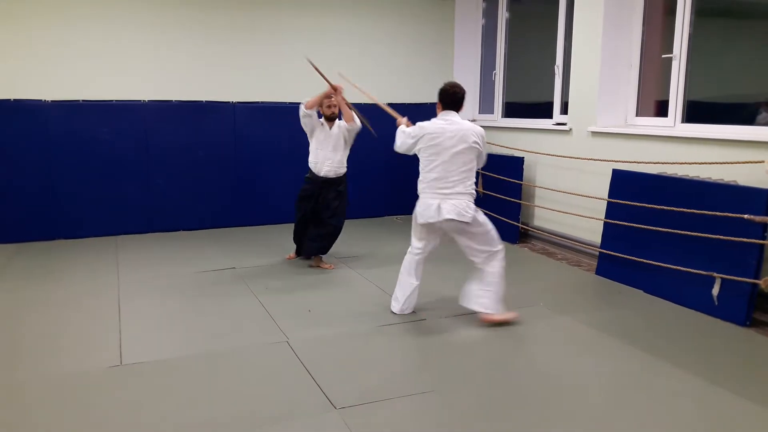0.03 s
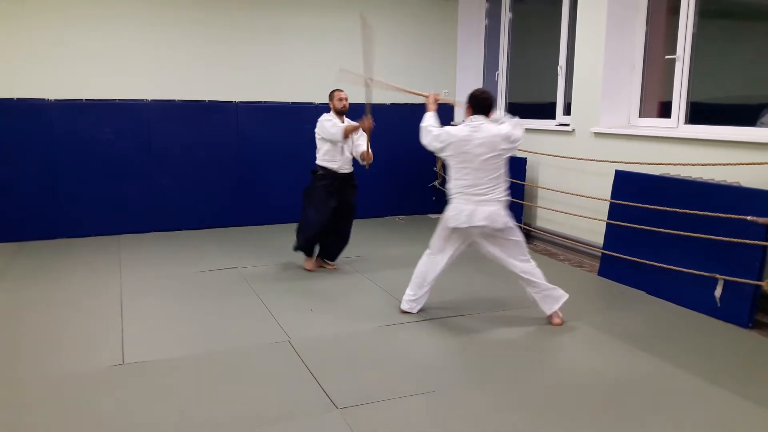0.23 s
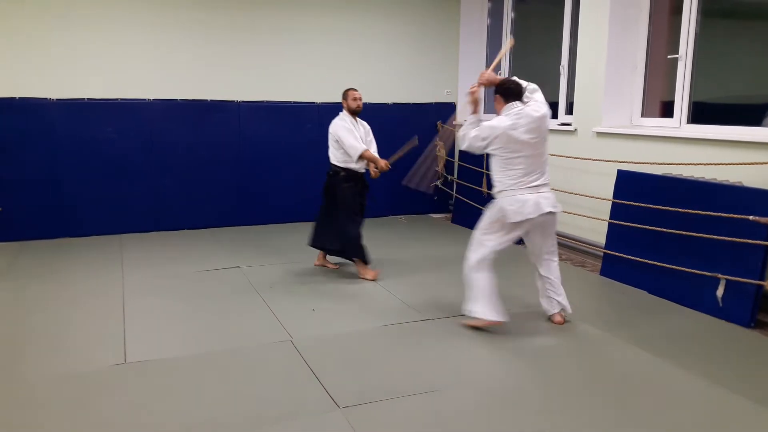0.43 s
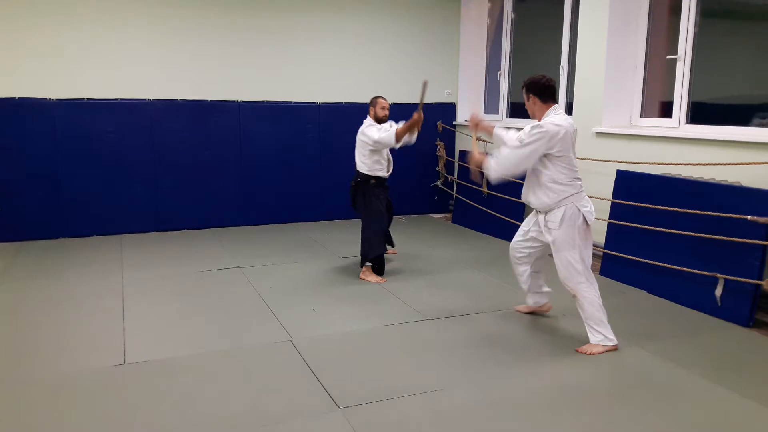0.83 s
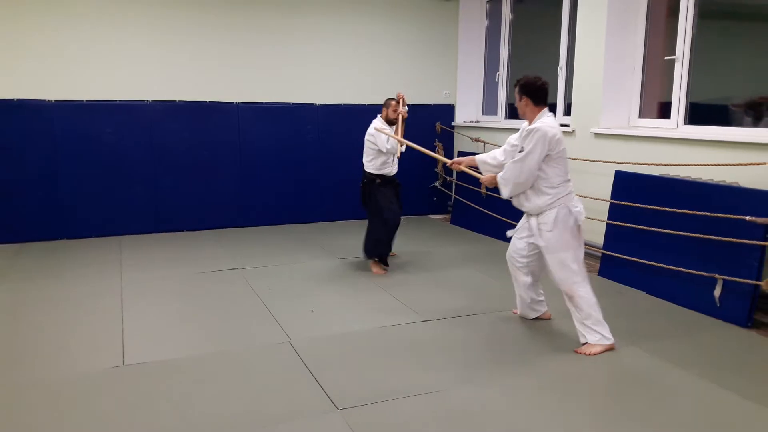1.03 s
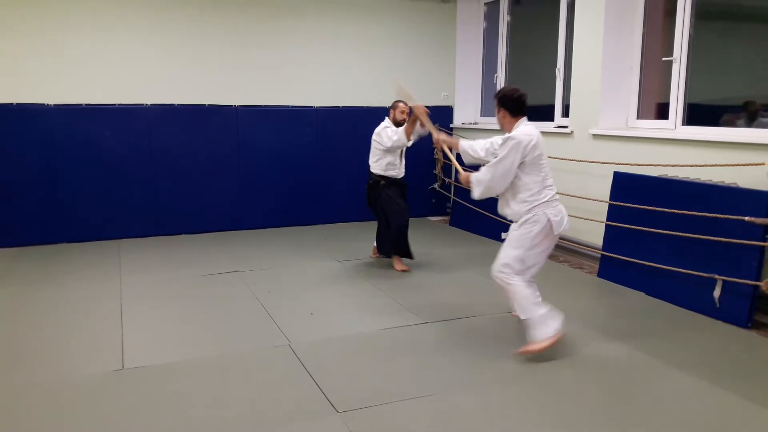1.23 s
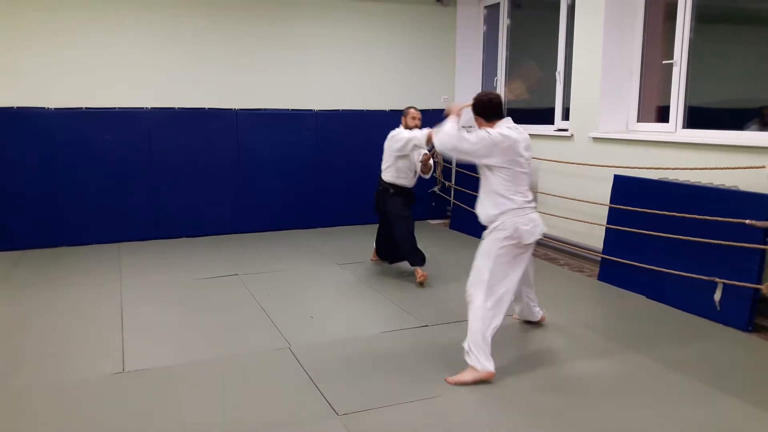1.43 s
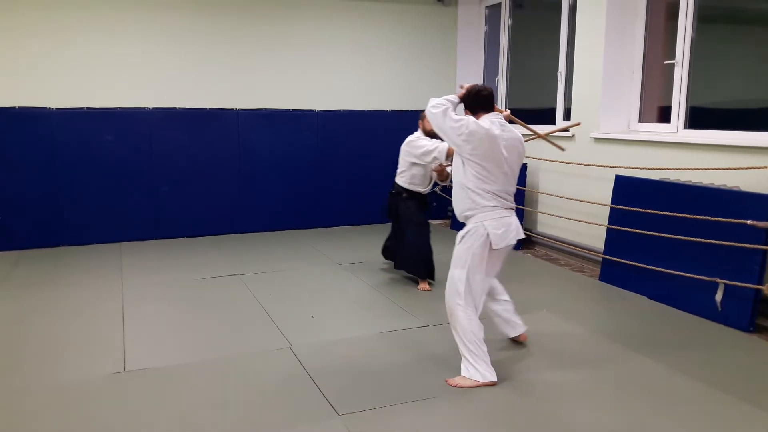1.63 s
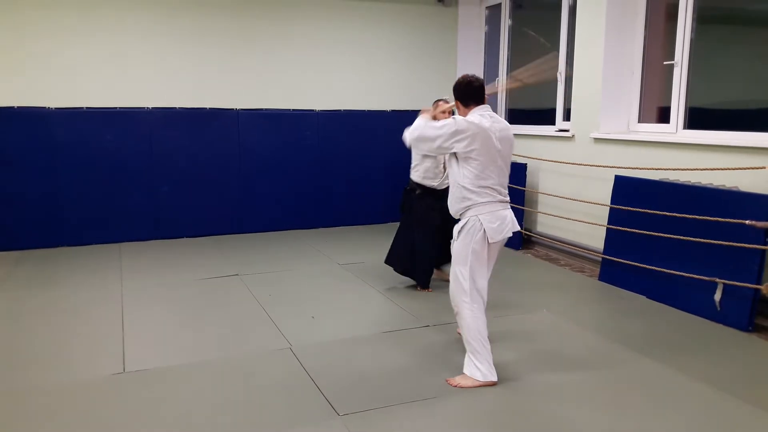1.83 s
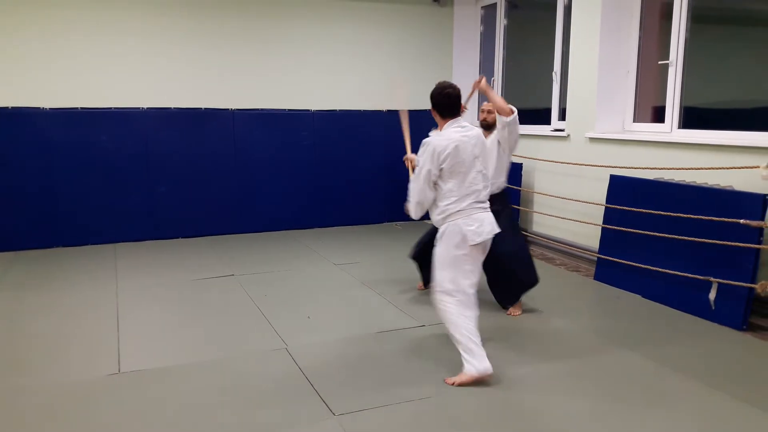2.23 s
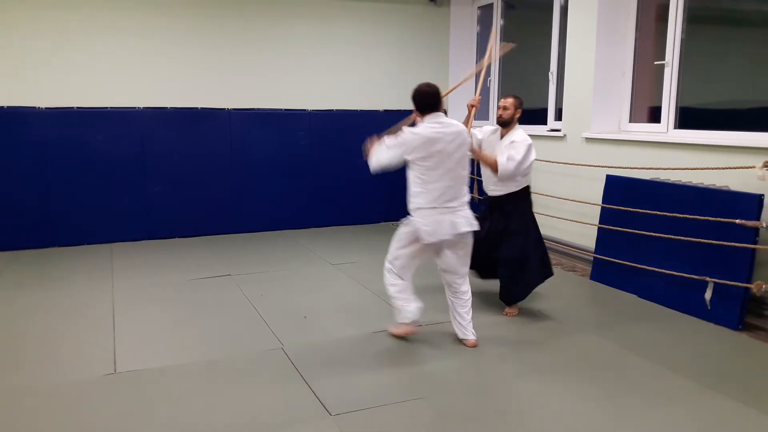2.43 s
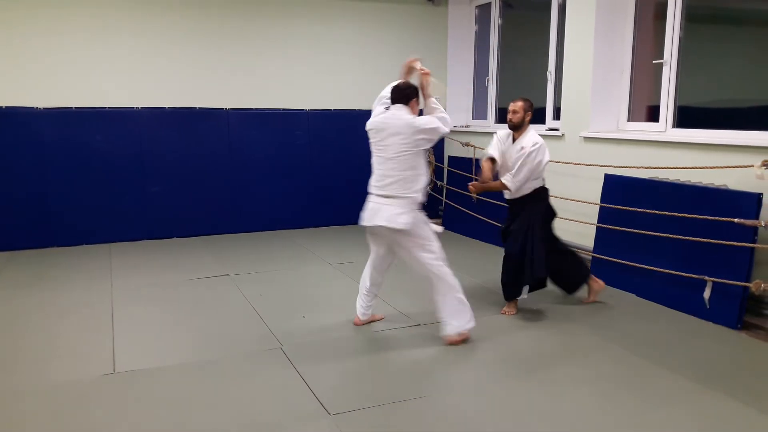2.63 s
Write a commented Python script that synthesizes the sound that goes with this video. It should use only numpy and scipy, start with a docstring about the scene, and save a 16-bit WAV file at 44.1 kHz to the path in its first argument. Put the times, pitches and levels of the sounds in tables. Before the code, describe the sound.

Wooden staffs crack together three times in a bare, echoing hall. A faint swish leads into the first hit at 0.2 seconds, which briefly overloads the microphone. The others land at 1.4 and 2.2 seconds, all slightly left, each echoing for about a second. Between and after the blows, jackets rustle and bare feet slide and thud quietly on mats, most noticeably from 2.2 to 2.5 seconds.

```python
"""Staff sparring in a bare hall

Two people spar on mats. Three sharp cracks send bending waves along the wooden staffs, set them
ringing and echo round the hall; the first overloads the left microphone and ducks the limiter.
Between blows jackets rustle, bare feet slide and thud, and a swung staff swishes, over still air."""
import sys
import numpy as np
from scipy import signal
from scipy.fft import rfft, irfft
from scipy.io import wavfile
from scipy.ndimage import uniform_filter1d, minimum_filter1d

SR = 44100
rng = np.random.default_rng(int(sys.argv[2]) if len(sys.argv) > 2 else 0)


def materialize(psi):
    """Save the field psi as 16-bit PCM at rate SR to the path in sys.argv[1].

    A 1-D psi becomes a single channel; in a 2-D psi each row is a channel.
    """
    bounded = np.clip(np.atleast_2d(psi).T, -1, 1)
    quanta = np.round(bounded * 32767).astype(np.int16)
    wavfile.write(sys.argv[1], SR, quanta)


N = 119070
TIME = np.arange(N) / SR
HZ = np.maximum(np.fft.rfftfreq(2 * N, 1 / SR), 1)
LN_1000 = np.log(1000)  # 60 dB of decay

# crack spectra: (frequency [Hz], level in blow 1, 2, 3 [dB])
CRACK_SPECTRA = [(169, -38, -24.5, -20.5), (400, -30, -20.5, -16.5), (630, -21, -15.5, -17),
                 (777.8, -16, -10.5, -5.5), (1190, -3, -2, -0.5), (1566, -5.5, 1.5, 3.5),
                 (2550, -0.5, 2, 1), (3590, -8, -1, 1), (3970, -7, -8.5, -12), (5100, -13, -8.5, -11.5),
                 (5540, -17, -14.5, -13), (7640, -15.5, -19.5, -22), (9100, -30.5, -38, -33.5),
                 (16200, -34.5, -45, -38)]


def from_db(db):
    """Decibels to gain."""
    return 10 ** (np.asarray(db) / 20)


def at_hz(points, hz, column=1):
    """Table column interpolated over log frequency."""
    table = np.array(points)
    return np.interp(np.log(hz), np.log(table[:, 0]), table[:, column])


def pan(db):
    """Stereo gains, left over right by db."""
    return from_db(np.array([[db], [-db]]) / 2)


def delay(s):
    """Frequency response of a delay."""
    return np.exp(-2j * np.pi * HZ * s)


def minimum_phase(db):
    """Causal response with the given levels."""
    cepstrum = irfft(np.log(from_db(db)))
    cepstrum[1:N] *= 2
    cepstrum[N + 1:] = 0
    return np.exp(rfft(cepstrum))


def resonance(hz, width_hz):
    """Response of one resonance, peak gain 1."""
    return 1 / (1 + 1j * (HZ ** 2 - hz ** 2) / (HZ * width_hz))


def filtered(x, response):
    """Signal through a frequency response."""
    return irfft(rfft(x, 2 * N) * response)[..., :N]


def noise(response, channels=2):
    """Coloured noise, independent channels, rms 1."""
    x = irfft(rfft(rng.standard_normal((channels, N))) * response[::2])
    return x / x.std()


def staff_blows(right_lag_s=.0001):
    """Each blow makes two contacts and a bending wave, highs first, that sets the staffs ringing."""
    # blows: (time [s], strength [dB], second contact lag [s], its level [dB], dispersion scale [s],
    # pan [dB], hall send [dB], hall decay factor [-])
    blows = [(.2143, 21, 0.001738, 4.5, 0.00041, 9.5, 7, 0.9),
             (1.3964, 14, 0.001225, -0.5, .0007, 9, 1.5, 1.08),
             (2.1620, 16, .0034, -9.5, 0.00055, 6.5, 1.12, 0.81)]
    # bending modes, share set by contact point: (frequency [Hz], t60 [s], re crack in blow 1, 2, 3 [dB])
    modes = [(346, 0.017, 4, 7, -10), (555, .04, -8, 0.5, 5), (810, 0.044, 0, -4, 5.5),
             (1104, 0.041, -1.5, 4, -5), (1225, 0.082, -7, -12, 4), (1374, 0.039, -1, -4.5, -32),
             (1540, 0.047, 3, -14, 4), (1891, 0.027, 0.5, -1, 0.5), (2130, 0.026, -40, -4, -38.5),
             (2427, 0.01, -15, -25, -9), (2694, 0.011, -5.5, -10, -10), (3050, 0.033, -21, -5.5, -20),
             (3640, 0.037, -9, -6, 2), (4810, 0.017, -10, -12, -7)]
    # first echoes off mat and walls: (left delay [s], right delay [s], left level [dB], right level [dB])
    reflections = [(.0026, .0037, -13, -13), (.0102, .0103, -10, -13), (.0215, .0195, -15, -14),
                   (.0245, .0255, -16, -15)]
    # colour of the direct sound: (frequency [Hz], level [dB])
    direct_spectrum = [(200, -10), (800, -1.5), (1500, -0.5), (2000, 0.5), (2450, 4.5), (3100, -0.5),
                       (4200, 3.5), (8000, -4), (16000, 8.5)]
    direct = minimum_phase(at_hz(direct_spectrum, HZ))
    echoes = sum(np.array([from_db(left_db) * delay(left_s), from_db(right_db) * delay(right_s)])
                 for left_s, right_s, left_db, right_db in reflections)
    rings = [resonance(hz, LN_1000 / np.pi / t60_s) for hz, t60_s, *_ in modes]
    ears = np.array([delay(0), delay(right_lag_s)]) * np.sqrt(.5)
    out = 0
    for k, (time_s, db, second_s, second_db, spread_s, pan_db, hall_db, decay_factor) in enumerate(blows):
        crack = from_db(db) * delay(time_s) * minimum_phase(at_hz(CRACK_SPECTRA, HZ, column=k + 1))
        bending = delay(2 * spread_s * np.sqrt(1000 / (HZ + 300)))
        wood = 1 + sum(from_db(mode[k + 2]) * ring for mode, ring in zip(modes, rings))
        contacts = 1 + from_db(second_db) * delay(second_s)
        near = contacts * direct * (pan(pan_db) * ears + echoes)
        reverb = from_db(hall_db) * hall_response(decay_factor)  # the contacts merge here
        out = out + crack * bending * wood * (near + reverb)
    return irfft(out)[:, :N]


def rustles(hall, pivot_hz=7000, grain_db=2.5, pan_db=7.5, hall_db=-7):
    """Jackets and soles brush in grainy swells, each with its own brightness."""
    # swells: (peak time [s], relative level [dB], rise [s], fall [s], tilt [dB/octave])
    swells = [(.055, -62.5, .05, 0.047, -0.5), (.16, -61.5, 0.034, 0.026, -4), (0.546, -46, 0.03, 0.02, -1),
              (.55, -37.5, 0.018, 0.036, -4.5), (.645, -49.5, 0.046, 0.037, 2.5),
              (.76, -59, 0.064, 0.04, 4), (1.063, -58, .012, 0.011, -4), (1.165, -61, 0.022, .045, 2),
              (1.275, -57, .04, 0.066, 2), (1.42, -54.5, 0.026, 0.055, 0), (1.60, -68, 0.051, 0.022, -2),
              (1.77, -47, 0.11, 0.097, -7), (2.125, -56, 0.023, .03, -1.5),
              (2.23, -39.5, 0.03, 0.091, -8.5), (2.36, -38.5, 0.081, 0.076, -6.5),
              (2.68, -46, 0.072, 0.067, -4.5)]
    # brushing spectrum: (frequency [Hz], level [dB])
    brush_spectrum = [(700, -22.5), (2000, 3), (4000, -6.5), (7500, -1.5), (9500, -6), (12500, -2.5),
                      (16000, -14)]
    colour_db = at_hz(brush_spectrum, HZ)
    octaves = np.log2(np.maximum(HZ, 1000) / pivot_hz)
    out = 0
    for peak_s, db, rise_s, fall_s, tilt in swells:
        swell = np.exp(-((TIME - peak_s) / np.where(TIME < peak_s, rise_s, fall_s)) ** 2 / 2)
        brush = noise(from_db(colour_db + tilt * octaves) * HZ / (HZ + 500))
        out = out + from_db(db + 1.5) * swell * brush
    grain = uniform_filter1d(rng.standard_normal(N), size=120)
    out = out * from_db(grain_db * grain / grain.std())
    return out * pan(pan_db) + filtered(out[0], from_db(hall_db) * hall)


def footsteps(hall, rise_s=0.003, relative_width=0.76, scuff_db=-4, hall_db=-6.5):
    """Bare feet land and push on the mats: soft thuds with a little scuff."""
    # footfalls: (time [s], level [dB], pitch [Hz], decay [s])
    footfalls = [(0.142, -62, 185, .05), (0.439, -65, 230, 0.073), (0.547, -63, 215, 0.073),
                 (0.615, -57, 250, 0.078), (1.267, -63, 227, 0.066), (1.311, -65, 110, 0.15),
                 (1.435, -62, 165, 0.097), (1.863, -59, 107, 0.13), (2.006, -64, 190, 0.19),
                 (2.091, -61.5, 101.5, 0.21), (2.202, -50.5, 213, 0.096), (2.344, -57.5, 159, 0.091),
                 (2.521, -61, 252, 0.18)]
    scuff = from_db(scuff_db) * noise(resonance(470, 760) ** 2, channels=1)[0]
    out = 0
    for time_s, db, hz, decay_s in footfalls:
        age_s = np.maximum(TIME - time_s, 0)
        envelope = (1 - np.exp(-age_s / rise_s)) * np.exp(-age_s / decay_s)
        thud = noise(resonance(hz, relative_width * hz) ** 2, channels=1)[0]
        out = out + from_db(db) * (thud + scuff) * envelope
    return out + filtered(out, from_db(hall_db) * hall)


def swish(peak_s=.11, sigma_s=0.07, pitch_hz=630, width_hz=240, level_db=-58):
    """A swung staff sheds eddies at one rough pitch."""
    swell = np.exp(-((TIME - peak_s) / sigma_s) ** 2 / 2)
    return from_db(level_db) * noise(resonance(pitch_hz, width_hz)) * swell


def hall_response(decay_factor, build_s=0.004, pan_db=2):
    """Diffuse echoes build quickly and die band by band, independent in each ear."""
    # reverberation: (frequency [Hz], base t60 [s], level [dB])
    reverb_bands = [(151, 0.42, 2), (428, 0.98, 4.5), (741.8, 1.07, 6), (1430, 1.056, 5.8), (2430, 1.37, 8),
                    (4100, 1.55, 5), (6700, 1.03, 5.5), (10185, 0.92, 5.5), (15700, .45, -3)]
    white = rfft(rng.standard_normal((2, N)))
    centres_hz = np.geomspace(200, 16000, 12)
    tail = 0
    for hz, one_hot in zip(centres_hz, np.eye(len(centres_hz))):
        band = irfft(white * np.interp(np.log(HZ[::2]), np.log(centres_hz), one_hot))
        gain = from_db(at_hz(reverb_bands, hz, column=2))
        t60_s = at_hz(reverb_bands, hz) * decay_factor
        tail = tail + band * gain * np.exp(-LN_1000 * TIME / t60_s)
    build = 1 - np.exp(-TIME / build_s)
    return rfft(tail * build * np.sqrt(10 / SR), 2 * N) * pan(pan_db)


def background(air_db=-58, tail_db=-63.5, tail_t60_s=1.6):
    """Still air and the dying reverberation of an earlier blow."""
    # air of the hall: (frequency [Hz], level [dB])
    air_spectrum = [(25, -3), (60, -10), (110, -4), (200, 0), (450, -11), (1000, -7.5), (2500, -2),
                    (6000, -11), (16000, -26)]
    tail = noise(from_db(at_hz(CRACK_SPECTRA, HZ, column=2))) * np.exp(-LN_1000 * TIME / tail_t60_s)
    air = noise(from_db(at_hz(air_spectrum, HZ)))
    return from_db(tail_db) * tail + from_db(air_db) * air


def scene():
    """All sources in one hall, stereo."""
    hall = hall_response(decay_factor=0.98)
    return staff_blows() + rustles(hall) + footsteps(hall) + swish() + background()


def record(dry):
    """Overload clips a microphone and kicks its bias into a thump; then low cut, limiter, top cut."""
    clip_level, thump_db, thump_hz = 1.2, 10, 730
    ceiling, release_db_per_s = .88, 89
    low_cut_hz, top_cut_hz = 80, 16100
    clipped = np.clip(dry, -clip_level, clip_level)
    thump = signal.sosfilt(signal.butter(2, thump_hz, fs=SR, output="sos"), np.abs(dry - clipped))
    x = clipped - from_db(thump_db) * thump
    x = signal.sosfilt(signal.butter(2, low_cut_hz, "high", fs=SR, output="sos"), x)
    over_db = 20 * np.log10(np.maximum(np.abs(x).max(axis=0) / ceiling, 1))
    release_db = release_db_per_s * TIME
    duck_db = np.maximum.accumulate(over_db + release_db) - release_db
    gain = uniform_filter1d(minimum_filter1d(from_db(-duck_db), size=41), size=41)
    return signal.sosfilt(signal.ellip(12, .1, 80, top_cut_hz, fs=SR, output="sos"), x * gain)


dry = scene()
out = record(dry)
materialize(out)
```